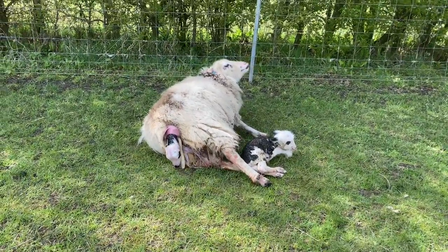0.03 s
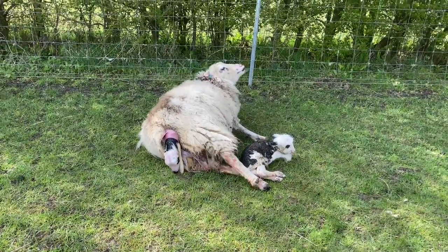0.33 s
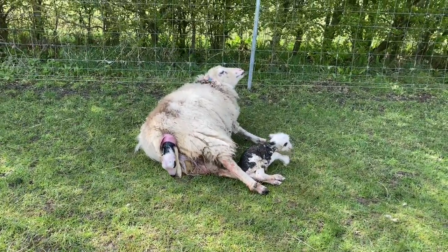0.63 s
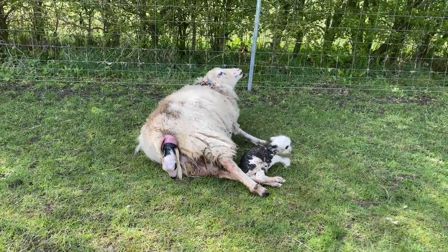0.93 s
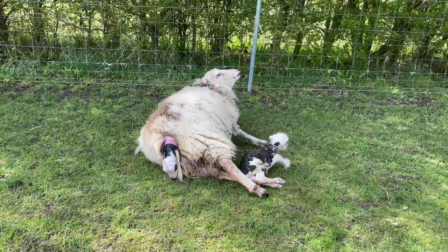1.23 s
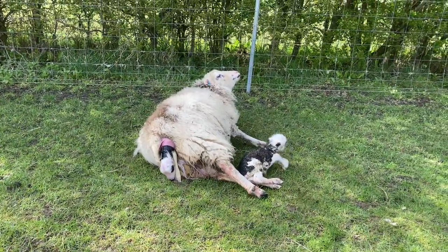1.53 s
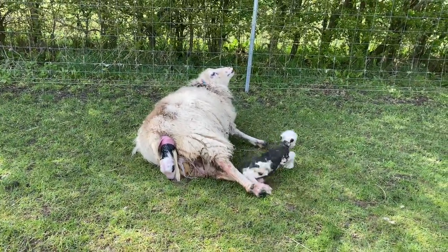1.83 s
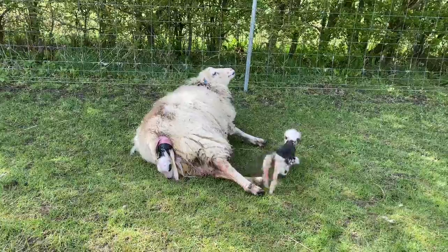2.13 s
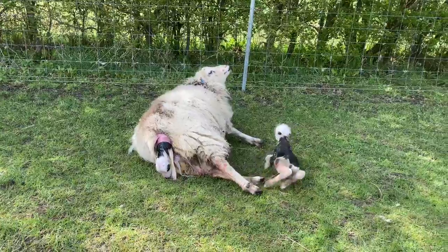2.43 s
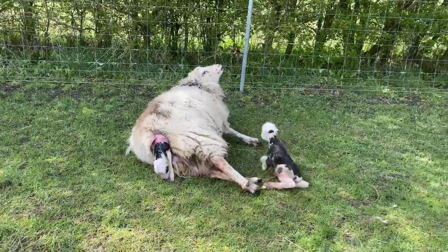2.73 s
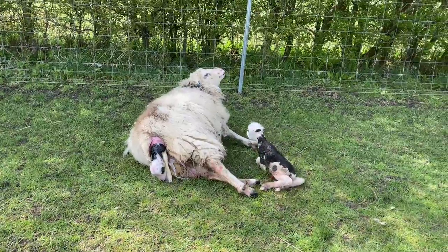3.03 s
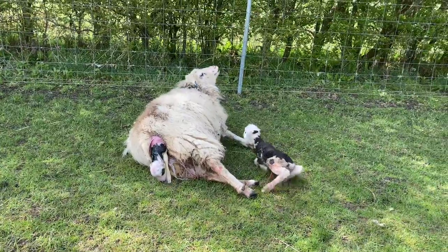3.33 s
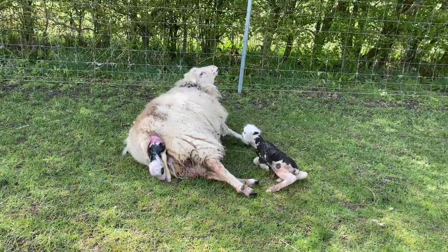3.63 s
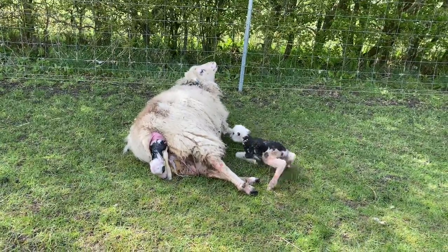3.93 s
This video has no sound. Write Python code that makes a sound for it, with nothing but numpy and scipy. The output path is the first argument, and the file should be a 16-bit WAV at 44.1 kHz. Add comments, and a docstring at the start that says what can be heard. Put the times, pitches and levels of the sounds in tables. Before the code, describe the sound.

A newborn lamb gives one short, thin bleat a few metres away in a field, with grass crackling before and after. Low wind rumble and a distant engine drone run throughout, and small birds chirp faintly.

```python
"""Newborn lamb in the grass

A few metres away a lamb struggles up, crackling blades and snapping stalks, and gives one thin bleat:
vocal-fold harmonics shaped by its throat, hoarse at both ends. Small birds whistle from the hedge.
Far farm engines drone at multiples of their firing rate over a dull roar and blurred machine noise,
under a low, gusty wind rumble and a faint hiss."""
import sys
import numpy as np
from scipy import signal
from scipy.fft import rfft, irfft
from scipy.io import wavfile

SR = 44100
rng = np.random.default_rng(int(sys.argv[2]) if len(sys.argv) > 2 else 0)


def waveform_to_disk(signal):
    """Save audio, clipped to [-1, 1], as 16-bit WAV at the path in sys.argv[1]."""
    frames = np.transpose(np.atleast_2d(signal))
    scaled = np.clip(frames, -1, 1) * 32767
    samples = np.round(scaled).astype(np.int16)
    wavfile.write(sys.argv[1], SR, samples)


N = 176400
TIME = np.arange(N) / SR
BIN_HZ = np.arange(N // 2 + 1) * SR / N


def undb(db):
    return 10 ** (np.asarray(db) / 20)


def unit(x):
    return x / np.sqrt(np.mean(x ** 2))


def curve(table, column=1):
    """One column of a table, joined by straight lines in time."""
    rows = np.array(table)
    return np.interp(TIME, rows[:, 0], rows[:, column])


def at_hz(table, hz, column=1):
    """One column of a table, read on a log-frequency axis."""
    rows = np.array(table)
    return np.interp(np.log(np.maximum(hz, 1)), np.log(rows[:, 0]), rows[:, column])


def colour(x, table):
    """EQ a signal through points of frequency in Hz and gain in dB."""
    return irfft(rfft(x) * undb(at_hz(table, BIN_HZ)), N)


def walk(hz):
    """Smooth random drift of spread 1 that moves at about this rate."""
    smoothing = np.exp(-(BIN_HZ / hz) ** 2) * (BIN_HZ > 0)
    return unit(irfft(rfft(rng.standard_normal(N)) * smoothing, N))


def running_phase(hz):
    return 2 * np.pi * (np.cumsum(hz) / SR + rng.random())


def tone(hz, db):
    """A sine that follows a pitch curve at this RMS level."""
    return np.sqrt(2) * undb(db) * np.sin(running_phase(hz))


def noise_pair(diffuse):
    """Left and right noise that share all but the diffuse part."""
    return np.sqrt(1 - diffuse ** 2) * rng.standard_normal(N) + diffuse * rng.standard_normal((2, N))


def bed(table, diffuse):
    """Steady stereo noise with the table's spectrum."""
    return colour(noise_pair(diffuse), table) * np.sqrt(SR / 2)


def place(x, table):
    """Set a sound in the stereo field with level and phase differences between the sides."""
    half = np.array([[1], [-1]]) / 2
    balance = undb(half * at_hz(table, BIN_HZ))
    lead = np.exp(1j * half * at_hz(table, BIN_HZ, column=2))
    return irfft(rfft(x) * balance * lead, N)


def from_right(x, lag_s):
    """Sound from the right reaches the left side a little late."""
    return irfft(rfft(x) * np.exp(-2j * np.pi * BIN_HZ * lag_s * np.array([[1], [0]])), N)


def hedge(x, t60_s=.17):
    """A short diffuse scatter from hedge and trees."""
    t = np.arange(SR // 2) / SR
    tail = rng.standard_normal((2, len(t))) * np.exp(-np.log(1000) * t / t60_s)
    return signal.fftconvolve(x[None], tail / np.sqrt(np.sum(tail ** 2) / 2), axes=1)[:, :N]


# The bleat's melody. Each row: time in seconds, pitch in Hz.
BLEAT_PITCH = [(2.63, 400), (2.67, 423), (2.695, 486.6), (2.728, 447), (2.745, 461), (2.773, 465.6),
               (2.795, 444.7), (2.853, 458.6), (2.92, 459.8), (2.987, 465), (3.022, 461.4), (3.037, 444),
               (3.05, 411), (3.08, 405)]
# The push behind it. Each row: time in seconds, throat fader in dB, bright resonance fader in dB.
BLEAT_EFFORT = [(2.61, -91, -107), (2.636, -80, -101), (2.656, -75.5, -86), (2.668, -76, -85),
                (2.69, -86, -82), (2.732, -72, -74), (2.768, -80, -77.5), (2.794, -70.5, -70.5),
                (2.834, -71.5, -68), (2.843, -76, -81), (2.86, -71, -71), (2.89, -73, -68),
                (2.91, -71.5, -66.5), (2.965, -72.5, -63), (2.988, -69, -74.5), (3.012, -72.5, -66.5),
                (3.045, -67.5, -74), (3.06, -82, -82), (3.08, -84, -94), (3.1, -92, -110)]
# Hoarse going in and coming out. Each row: time in seconds, roughness from 0 to 1.
BLEAT_ROUGHNESS = [(2.63, 0.5), (2.685, 0.7), (2.715, 0.24), (2.8, 0.04), (3.015, 0), (3.04, 0.36),
                   (3.07, 0.83)]
# The body of the voice. Each row: frequency in Hz, gain in dB.
THROAT_EQ = [(300, 2), (460, 10.5), (920, 4.5), (1380, -4.5), (1840, 3), (2300, -10.5), (2760, -25),
             (3220, -12.5), (3700, -23), (4200, -38), (5100, -36), (7000, -36), (9000, -58)]
# The bright ring of the upper resonance. Each row: time in seconds, centre in Hz.
RING_CENTRE = [(2.66, 4000), (2.72, 3780), (2.76, 3733), (2.795, 3660), (2.825, 3970), (2.85, 3700),
               (2.875, 3724), (2.91, 3978), (2.965, 4010), (2.992, 4326), (3.015, 4126), (3.05, 4075)]
# Where the lamb sits in stereo. Each row: frequency in Hz, left over right in dB, left lead in radians.
LAMB_IMAGE = [(467, -3, -0.33), (920, 3, 0.38), (1450, 5, -0.51), (1870, 4.5, 1), (2230, 14, .2),
              (2751, -7, .3), (3180, 2, -1.2), (3350, -2, -2.4), (4080, -0.5, -0.17), (4980, 26, .5),
              (5650, 5, 0.13)]
TREMOR, JITTER = .0035, .034  # fractions of the pitch
RING_WIDTH_HZ, RING_SKIRT_HZ, OVERTONE_HZ, OVERTONE_WIDTH_HZ = 465, 1000, 6250, 450
RASP_DB, RING_RASP_DB, LAMB_ECHO_DB = 5, 3, -14


def lamb():
    """Wavering vocal-fold harmonics pass the throat and a moving resonance, and rasp when hoarse."""
    rough = curve(BLEAT_ROUGHNESS)
    throat_db, ring_db = curve(BLEAT_EFFORT), curve(BLEAT_EFFORT, column=2)
    pitch = curve(BLEAT_PITCH) * (1 + TREMOR * walk(120) + JITTER * rough * walk(170))
    phase = running_phase(pitch)
    harmonics = np.arange(1, 20)[:, None]
    hz = harmonics * pitch
    shimmer = undb([walk(70) for _ in harmonics])
    partials = shimmer * np.sin(harmonics * phase)
    throat = np.sqrt(2) * (undb(at_hz(THROAT_EQ, hz)) * partials).sum(0)

    offset_hz = hz - curve(RING_CENTRE)
    resonance = (1 + (offset_hz / RING_WIDTH_HZ) ** 2) ** -2 * np.exp(-(offset_hz / RING_SKIRT_HZ) ** 4)
    strain_db = ring_db - ring_db.max()  # strain brings out a faint higher peak
    resonance += undb(strain_db - 26) * np.exp(-((hz - OVERTONE_HZ) / OVERTONE_WIDTH_HZ) ** 2)
    ring = (resonance * partials).sum(0) / np.sqrt((resonance ** 2).sum(0) / 2)

    puffs = rng.standard_normal(N) * (1 + np.cos(phase))  # one puff of breath per cycle
    rasp = unit(colour(puffs, [(500, -28), (900, 0), (1200, 1), (1700, 15), (2150, 21),
                               (2700, -31), (6000, -30), (10000, -50)]))
    ring_rasp = unit(colour(puffs, [(2800, -41), (3600, -4), (4100, 6), (4500, 0), (5200, -28)]))

    clear = np.sqrt(1 - rough ** 2)
    voice = undb(throat_db + 1.5) * (clear * throat + rough * undb(RASP_DB) * rasp)
    voice += undb(ring_db + 1) * (clear * ring + rough * undb(RING_RASP_DB) * ring_rasp)
    edge_s = np.minimum(TIME - BLEAT_EFFORT[0][0], BLEAT_EFFORT[-1][0] - TIME)
    voice *= np.clip(edge_s / .023, 0, 1)  # fade in and out
    return place(voice, LAMB_IMAGE) + undb(LAMB_ECHO_DB) * hedge(voice)


# Shoves through the grass. Each row: middle in seconds, half length in seconds, relative level in dB.
SHOVES = [(1.824, 0.029, -92), (1.913, 0.023, -93.5), (2.043, 0.024, -91), (2.13, .03, -102),
          (2.249, 0.058, -92), (2.332, 0.03, -90), (2.43, 0.028, -92), (2.506, 0.064, -92.5),
          (2.699, 0.055, -93.5), (2.96, 0.076, -96.5), (3.182, 0.043, -89.5), (3.27, 0.042, -86.5),
          (3.32, 0.024, -87), (3.402, 0.043, -98), (3.813, 0.035, -93.5), (3.916, 0.0072, -89),
          (3.939, 0.025, -83.5), (3.99, 0.029, -82.5)]
# The crisp tone of the blades. Each row: frequency in Hz, gain in dB.
GRASS_EQ = [(1200, -16), (2800, -5), (3800, -4.5), (4700, 1), (5400, 0), (6800, 5), (7800, 4), (9200, -16),
            (10400, 5), (11600, -2.5), (13000, -4), (15000, -15)]
GRAINS_PER_BAND_PER_S, GRAIN_DB, PATCH_DB, GRASS_GAIN_DB = 1400, 2.6, 3, 13


def grass():
    """Each shove of the lamb's legs crackles many blades, whose colour shifts from band to band."""
    power = sum(undb(db) ** 2 * np.exp(-((TIME - middle) / half) ** 2) for middle, half, db in SHOVES)
    crackle = 0
    for hz in 1500 * 2 ** np.arange(0, 3.5, .5):
        grains = noise_pair(diffuse=.35) * (rng.random(N) < GRAINS_PER_BAND_PER_S / SR)
        grains *= undb(GRAIN_DB * np.minimum(rng.exponential(size=N), 5))  # a few stand out
        band = [(hz / 2, -40), (hz / np.sqrt(2), -6), (hz, 0), (hz * np.sqrt(2), -6), (hz * 2, -40)]
        crackle += colour(grains, band) * undb(PATCH_DB * walk(30))
    rustle = from_right(unit(colour(crackle, GRASS_EQ)), lag_s=.00027)
    return rustle * np.sqrt(power) * undb(GRASS_GAIN_DB + 1.5 * walk(30))


# Stalks giving way. Each row: start in seconds, level in dB, brightness in dB per octave.
STALK_SNAPS = [(.818, -66, 6), (1.142, -64, 10), (1.8045, -69, 0), (1.8255, -72, 5), (1.9084, -71, 3),
               (2.265, -62, 14), (2.4267, -66, 4), (3.1395, -76, 6), (3.168, -73, 6), (3.1928, -47, -7.5),
               (3.2578, -68, 6), (3.291, -60, 4), (3.3161, -69, 9), (3.9155, -64, 18), (3.9751, -62, -4)]
# The ring of a stalk. Each row: frequency in Hz, relative level in dB, seconds to fall by 60 dB.
STALK_MODES = [(1850, -12, .007), (2430, -10, 0.0077), (3120, -5.5, 0.0079), (3820, -10, 0.0087),
               (5100, -6, 0.0058), (6560, -7, 0.0082), (7500, -3.5, 0.0072), (10500, -13, .004)]
MODE_DETUNE, SNAP_ATTACK_S, SPLINTER_DECAY_S, SPLINTER_DB = .015, .0005, .0022, -12


def snaps():
    """A stalk breaks: its modes ring for a few milliseconds and its fibres splinter."""
    out = 0
    for start, db, tilt_db in STALK_SNAPS:
        age = np.maximum(TIME - start, 0)
        live = (age > 0) & (age < .02)
        ring = np.zeros(N)
        for hz, mode_db, t60 in STALK_MODES:
            phase = 2 * np.pi * hz * (1 + MODE_DETUNE * rng.standard_normal()) * age[live]
            decay = np.exp(-np.log(1000) * age[live] / t60)
            ring[live] += undb(mode_db + tilt_db * np.log2(hz / 5000)) * np.sin(phase) * decay
        splinters = noise_pair(diffuse=.4) * live * np.exp(-age / SPLINTER_DECAY_S)
        attack = 1 - np.exp(-age / SNAP_ATTACK_S)
        out += undb(db) * attack * (ring + undb(SPLINTER_DB) * splinters)
    return from_right(out, lag_s=.00003)


# One high, falling chip. Each row: time in seconds, pitch in Hz, level in dB.
BIRD_CHIP = [(1.005, 8440, -100), (1.022, 8040, -80), (1.038, 8000, -77), (1.044, 7550, -67.5),
             (1.051, 6850, -70), (1.06, 6350, -79), (1.068, 6300, -94)]


def near_bird():
    """A quick downward whistle with a rough edge scatters off the hedge."""
    hz = curve(BIRD_CHIP) * (1 + .034 * walk(470))
    gate = (TIME > BIRD_CHIP[0][0]) & (TIME < BIRD_CHIP[-1][0])
    chip = tone(hz, curve(BIRD_CHIP, column=2)) * gate
    return from_right(chip, lag_s=.00015) + undb(-9) * hedge(chip)


# Distant calls. Each row: start and length in seconds, first and last pitch in Hz, level in dB.
BIRD_NOTES = [(0.014, .06, 2160, 2160, -78), (0.025, 0.025, 2700, 2475, -76),
              (0.092, 0.042, 2760, 2640, -76.5), (0.158, 0.045, 3110, 2720, -84),
              (0.327, 0.053, 2310, 2130, -77.5), (0.398, 0.032, 2500, 2540, -85),
              (0.483, 0.043, 2150, 2150, -90), (1.47, 0.14, 2179, 2300, -78),
              (2.056, 0.28, 1973, 2036, -74), (2.067, 0.15, 1550, 1510, -73),
              (2.406, 0.077, 2060, 1976, -80), (3.68, .12, 2070, 2200, -79)]


def far_birds():
    """Short warbled whistles arrive blurred by the trees."""
    notes = 0
    for start, length, first_hz, last_hz, db in BIRD_NOTES:
        progress = np.clip((TIME - start) / length, 0, 1)
        glide_hz = first_hz + (last_hz - first_hz) * progress
        warble = 1 + .03 * walk(101)
        notes += np.sin(np.pi * progress) * tone(glide_hz * warble, db)
    return hedge(notes)


# The main engine's pace. Each row: time in seconds, firing rate in Hz.
FIRING_RATE = [(0, 62.4), (.7, 61.4), (1.1, 61.01), (1.75, 60.97), (2.1, 60.35), (2.5, 60.24), (2.9, 60.45),
               (3.3, 61), (4, 60.05)]
# Its low, middle and top partials. Each row: multiple of the firing rate, relative level in dB.
LOW_PARTIALS = [(5, -8.5), (5.75, -14.5), (6, -0.45), (6.25, -5.5), (7, -15), (7.5, -14)]
MID_PARTIALS = [(8, 4), (9, -20.5)]
TOP_PARTIALS = [(10, 2), (10.25, -22), (10.5, -22), (12, -34), (15, -42.5)]
# The body of the drone. Each row: time in seconds, low fader in dB, middle fader in dB.
DRONE_FADERS = [(0.0, -58, -62.5), (0.05, -54.5, -58.5), (0.34, -55, -62.5), (0.46, -54.5, -55.5),
                (0.87, -57.5, -65.5), (1.0, -51, -53.5), (1.32, -59.5, -62), (1.87, -55, -59.5),
                (1.95, -59.5, -63.5), (2.57, -56.5, -61.5), (2.75, -61.5, -68), (3.13, -56, -56),
                (3.43, -56, -68), (3.46, -57.5, -69.5), (3.77, -61.5, -59.5), (4.0, -64, -64)]
# Its upper edge. Each row: time in seconds, top fader in dB.
TOP_FADER = [(0, -75), (.5, -67), (1, -70), (1.45, -75.5), (1.75, -63.5), (2.4, -62), (2.8, -67),
             (3.05, -57), (3.45, -66.5), (3.7, -58.5), (4, -58.5)]
DRONE_GAIN_DB = 1.5


def engine_drone():
    """Partials locked to the main engine's firing rate fade and flutter on their way here."""
    firing_hz = curve(FIRING_RATE) * (1 + .0012 * walk(8.8))

    def stack(partials, fade_db, flutter_db):
        return sum(tone(order * firing_hz, db + fade_db * walk(2.1) + flutter_db * walk(16))
                   for order, db in partials)

    low = stack(LOW_PARTIALS, fade_db=1.83, flutter_db=2) * undb(curve(DRONE_FADERS))
    mid = stack(MID_PARTIALS, fade_db=.7, flutter_db=1.3) * undb(curve(DRONE_FADERS, column=2))
    top = stack(TOP_PARTIALS, fade_db=.7, flutter_db=1.3) * undb(curve(TOP_FADER))
    return (low + mid) * undb(DRONE_GAIN_DB) + top


# The engines' bass notes. Each row: frequency in Hz, level in dB.
HUM_TONES = [(58, -52), (74.9, -50), (78.5, -59.5), (116.1, -59), (121.9, -58), (150, -65)]


def engine_hum():
    """Low engine tones, each drifting slowly in pitch and level."""
    return sum(tone(hz * (1 + .0043 * walk(.59)), db + 1.7 * walk(2)) for hz, db in HUM_TONES)


# The dull colour of the roar. Each row: frequency in Hz, noise density in dB per Hz.
ROAR_SPECTRUM = [(20, -120), (100, -102), (220, -82.5), (320, -82.5), (430, -79), (520, -82), (600, -84),
                 (690, -100), (900, -115), (2000, -150)]
# Its swells. Each row: time in seconds, gain in dB.
ROAR_FADER = [(0, 0.5), (.25, -2), (.57, -2.5), (.85, -8.5), (1.1, 1), (1.38, -3), (1.7, -2), (2.2, -5),
              (2.55, -3.5), (2.85, -5), (3.1, 2), (3.4, -4.5), (3.75, -2.5), (4, -3)]


def engine_roar():
    """The far engines' low noise swells and sinks."""
    return bed(ROAR_SPECTRUM, diffuse=.34) * undb(curve(ROAR_FADER) + 2.46 * walk(4.6))


# Machine noise, body and treble. Each row: frequency in Hz, noise density in dB per Hz.
BODY_SPECTRUM = [(400, -120), (650, -96.5), (780, -90.5), (950, -91), (1150, -98), (1400, -110),
                 (2000, -135), (4000, -160)]
TREBLE_SPECTRUM = [(900, -130), (1250, -102), (1600, -103), (2200, -109.5), (2800, -120), (5000, -135),
                   (10000, -155)]
# The rise and fall of those two bands. Each row: time in seconds, gain in dB.
BODY_FADER = [(0, 3), (.25, -4), (.57, 3), (.9, -2.5), (1.1, 5), (1.38, -1), (1.7, 0.5), (2.2, 0.5),
              (2.55, -1.5), (2.85, -4.5), (3.1, 2.5), (3.4, -1), (3.75, -5), (4, -1)]
TREBLE_FADER = [(0, 3.5), (.25, -2), (.55, -1), (.9, -4), (1.12, 0.5), (1.38, -1), (1.7, -4), (2.2, -0.5),
                (2.55, -3.5), (2.85, -2), (3.1, -1.5), (3.45, -2.5), (3.75, -2), (4, -3.5)]


def machine_clatter():
    """Far machinery blurs into a wavering midrange wash with a flickering treble."""
    body = bed(BODY_SPECTRUM, diffuse=.59) * undb(curve(BODY_FADER) + 1.94 * walk(5.4))
    treble = bed(TREBLE_SPECTRUM, diffuse=.59) * undb(curve(TREBLE_FADER) + 1.5 * walk(15))
    return body + treble


# Where the engines sit. Each row: frequency in Hz, left over right in dB, left lead in radians.
ENGINE_IMAGE = [(59, -1, 0.39), (176, -3, 0.6), (286, -0.5, 1.08), (328, 0, 1.28), (433, 1, 1.57),
                (660, 2.5, 1.93), (984, 5.5, 3), (1244, -3, 3.6), (1880, 1, 4.48), (4250, 3.5, 13.5)]


def engines():
    """All the engine layers arrive from one distant direction."""
    return place(engine_drone() + engine_hum() + engine_roar() + machine_clatter(), ENGINE_IMAGE)


# Wind rumble and airy hiss. Each row: frequency in Hz, noise density in dB per Hz.
RUMBLE_SPECTRUM = [(5, -125), (18, -100), (25, -87.5), (36, -79), (52, -62.5), (80, -72), (110, -74),
                   (160, -80), (250, -88), (400, -94), (1000, -130), (3000, -160)]
HISS_SPECTRUM = [(500, -118), (2000, -122), (3000, -124), (4500, -123), (5500, -124), (7500, -125),
                 (11500, -126), (12800, -131), (13600, -150)]
# Gusts in the rumble. Each row: time in seconds, gain in dB.
GUST_FADER = [(0, -8), (.13, 9.5), (.27, -2), (.47, 4), (.62, 2.5), (1.25, 0.5), (1.6, -1.5), (2.05, -1),
              (2.6, 2), (2.85, -3.5), (3.08, 2), (3.3, 0), (3.7, -1), (4, -5)]


def wind():
    """Moving air makes a gusty low rumble and a faint even hiss."""
    rumble = bed(RUMBLE_SPECTRUM, diffuse=.2) * undb(curve(GUST_FADER) + .5 * walk(3.7))
    hiss = from_right(bed(HISS_SPECTRUM, diffuse=.9), lag_s=.00027)
    return rumble + hiss


def scene():
    return lamb() + grass() + snaps() + near_bird() + far_birds() + engines() + wind()


def record(dry):
    """A steep low-pass cuts the top above 15.1 kHz."""
    return signal.sosfilt(signal.ellip(8, .2, 70, 15100, fs=SR, output="sos"), dry)


dry = scene()
out = record(dry)
waveform_to_disk(out)
```